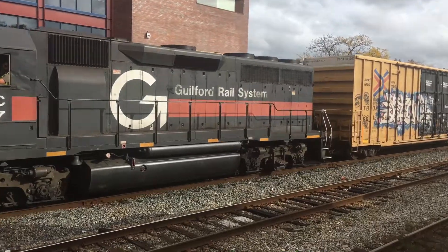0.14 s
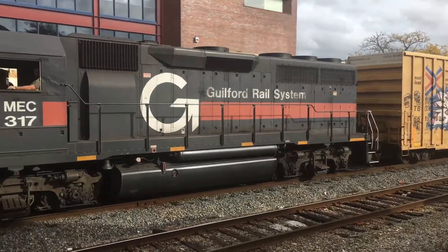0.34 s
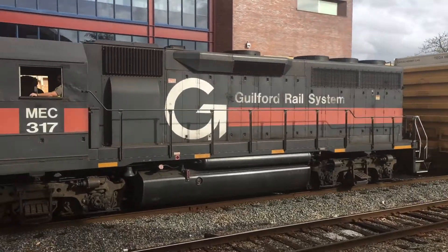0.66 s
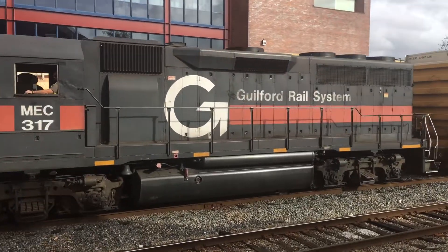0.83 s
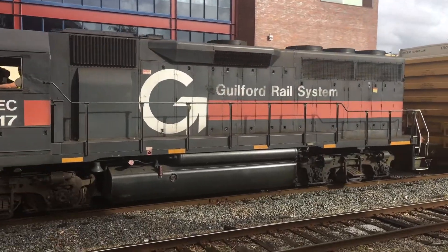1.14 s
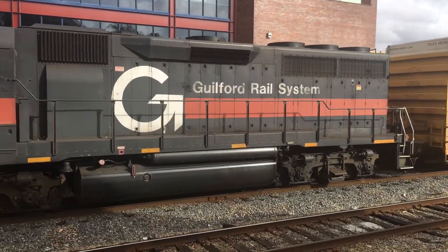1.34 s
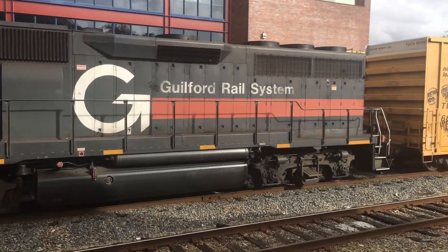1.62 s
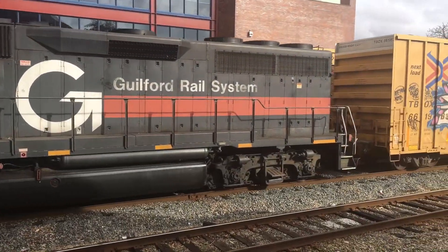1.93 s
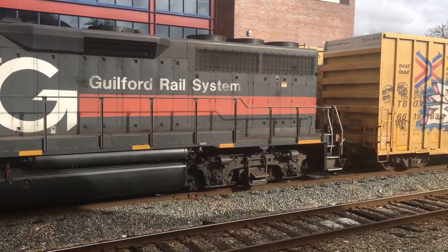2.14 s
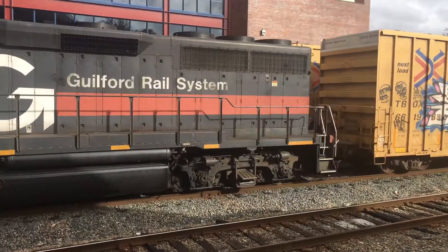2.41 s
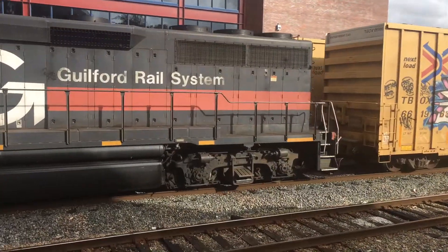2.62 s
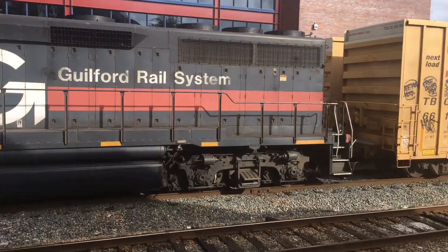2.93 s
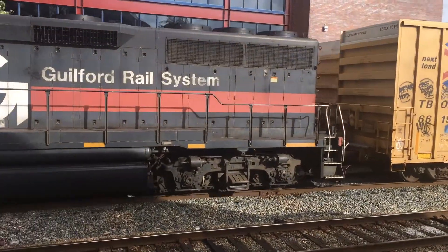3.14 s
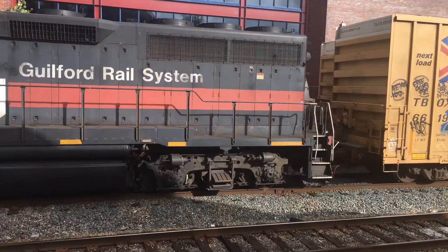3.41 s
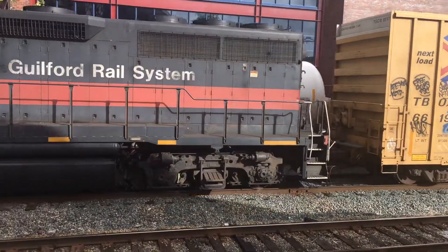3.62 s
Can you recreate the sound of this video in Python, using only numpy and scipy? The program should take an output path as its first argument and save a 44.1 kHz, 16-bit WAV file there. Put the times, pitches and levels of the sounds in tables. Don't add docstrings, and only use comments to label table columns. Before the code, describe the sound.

A diesel locomotive rolls slowly past, throbbing and whining, with wheel clacks over rail joints later

```python
import sys
import numpy as np
from scipy import signal
from scipy.io import wavfile
from scipy.ndimage import uniform_filter1d

SR = 44100
rng = np.random.default_rng(int(sys.argv[2]) if len(sys.argv) > 2 else 0)


def persist_wave(psi):
    counts = np.round(np.clip(psi, -1, 1) * 32767).astype(np.int16)
    wavfile.write(sys.argv[1], SR, np.atleast_2d(counts).T)


def ratio(d):
    e = np.asarray(d, float) / 20
    return 10 ** e


N = 166257
t = np.arange(N) / SR

CRANK_HZ, START_TURN = 5.2078, .5907
SAG_HZ_PER_S, EASE_HZ_PER_S2 = .03152, .005515
TURNS = START_TURN + CRANK_HZ * t - SAG_HZ_PER_S * t ** 2 / 2 + EASE_HZ_PER_S2 * t ** 3 / 3


def evened(x):
    return x / np.sqrt(np.mean(abs(x) ** 2) + 1e-20)


def read(points, hz):
    f, value = np.transpose(points)
    return np.interp(np.log(hz + 1), np.log(f + 1), value, -90, -90)


def curve(points):
    return ratio(np.interp(t, *np.transpose(points)))


def drift(width_hz):
    at = np.arange(-.4, N / SR + .1, 10 / SR)
    pole = np.exp(-np.pi * width_hz * 10 / SR)
    a, b = rng.standard_normal((len(at), 2)).T
    slow = signal.lfilter([1], [1, -2 * pole, pole * pole], a + 1j * b)
    return evened(np.interp(t, at, slow))


def near(share, leak=0):
    # time_s, nearness_db, air_leak_db
    running_gear = [(0, -44, 3.5), (.12, -47.5, 2.5), (.4, -48, -1.5), (.9, -47.5, -2), (1.2, -45, -1.5),
                    (2.05, -45.5, -4), (2.5, -43.5, -7), (2.85, -43.5, 0.5), (3.0, -39, -2.5),
                    (3.16, -42, 1), (3.25, -42, -3), (3.77, -45, 2)]
    s, near_db, leak_db = np.transpose(running_gear)
    middle_db = -47
    return ratio(np.interp(t, s, share * (near_db - middle_db) + leak * leak_db))


def noise(shape, size, patchy_db, flicker_db):
    hop = size // 4
    frames, hz = N // hop + 5, np.fft.rfftfreq(size, 1 / SR)
    a, b, patches = rng.standard_normal((frames, len(hz), 3)).T
    flicker = evened(uniform_filter1d(rng.standard_normal(frames), size=3))
    patches = uniform_filter1d(patches, size=10, axis=0)
    patches = evened(uniform_filter1d(patches, size=10, axis=1))
    level_db = read(shape, hz)[:, None] + patchy_db * patches + flicker_db * flicker
    spectra = (a + 1j * b) * ratio(level_db)
    return evened(signal.istft(spectra, nperseg=size, noverlap=size - hop)[1][:N])


def tone(turns, width_hz, db, steady, follow):
    waver = steady + (1 - steady) * drift(width_hz)
    return ratio(db) * near(follow) * (waver * np.exp(2j * np.pi * turns)).real


def exhaust():
    crank_orders = [8, 9, 10, 13, 14, 15, 16, 17, 18, 21, 29, 30, 31, 32, 33, 23, 53, 78, 79, 11, 12, 19]
    banks = [0, 0, 0, 1, 1, 0, -1, 0, 1, 1, 0, -1, 1, 0, 0, 0, 1, -1, 0, 1, 0, -1]
    # level_db, growth_db_per_s, echo_share (0-1), echo_cancels_s, beat_period_s
    orders = [(-31, 3, .58, 2.78, 6.25), (-26, -1, .37, .44, 3.57), (-32, -2, .79, .04, 4.17),
              (-33, 2, .6, 1.8, -2.5), (-46.5, 4.5, .59, .14, 1.14), (-19.2, .8, .48, 1.95, 2.45),
              (-30.5, .5, .85, 2.33, 2.4), (-21.8, .8, .6, 1.06, 1.53), (-34, -3, .88, 3.06, 3.12),
              (-32.5, .7, .6, 1.85, -4), (-44, 0, .97, .59, 3.12), (-33, -1.5, .5, .9, 3),
              (-53.5, 4.5, .95, .26, 1.67), (-45, 3.5, .57, 1.96, -6.25), (-47, 4, .4, .2, 1.67),
              (-40, 1, .5, .95, 2.4), (-43, -1, .1, 2.2, 3), (-38.5, -2, .2, 2.3, 4), (-39, -3, .2, 1.4, 3),
              (-35, 0, .6, 1.15, 1.45), (-39, 1, .4, .4, 3.6), (-37, 0, .7, .7, 2.4)]
    # time_s, level_db
    stack = [(0, 2), (.3, -1), (.9, 0.5), (1.5, -1.1), (2.1, -0.3), (2.6, -0.6), (3.1, 0), (3.77, -0.9)]
    bank_turn = 1 / 3
    out = np.zeros(N)
    for k, bank, (db, growth_db, echo, null_s, beat_s) in zip(crank_orders, banks, orders):
        wall = echo * np.exp(2j * np.pi * (t - null_s) / beat_s)
        paths = 1 - wall + .1 * drift(3.0)
        pulse = np.exp(2j * np.pi * (k * TURNS + bank * bank_turn))
        out += np.sqrt(2) * ratio(db + growth_db * t) * (paths * pulse).real
    return out * curve(stack)


def frame_rumble():
    # pitch_hz, level_db (per Hz)
    rumble = [(20, -21), (34, -7), (58, 0), (80, -5), (110, -3), (165, -9), (220, -15), (300, -30)]
    return ratio(-26) * near(0.55) * noise(rumble, size=8192, patchy_db=-0.5, flicker_db=0.0)


def rolling_roar():
    # pitch_hz, level_db (per Hz)
    roar = [(88, -9), (150, -14), (220, -4), (404, -6.5), (571, -11), (817, -9.5), (899, -13.5),
            (1470, -16), (2600, -32), (3380, -86), (5720, -120)]
    return ratio(-28) * near(0.48) * noise(roar, size=1024, patchy_db=1.53, flicker_db=0.17)


def air():
    # pitch_hz, level_db (per Hz)
    hiss = [(1500, -14.5), (2000, 1), (2600, -5), (3300, -1.5), (5000, -8.5), (5800, -7), (7000, -11),
            (9500, -37)]
    fizz = [(5500, -20), (7000, -7), (8500, -0.5), (9700, -4), (10600, -8.5), (13000, -9), (16000, -20)]
    return (ratio(-41.5) * near(0.96) * noise(hiss, size=512, patchy_db=1.62, flicker_db=1.18)
            + ratio(-52) * near(1.26, leak=0.89) * noise(fizz, size=512, patchy_db=2.4, flicker_db=.6))


def gear_mesh():
    # time_s, level_db
    mesh = [(0, -36), (.18, -33), (.38, -39), (.8, -33), (1.5, -35), (2.0, -39), (2.35, -36), (2.6, -43),
            (2.85, -38), (3.1, -39), (3.22, -45), (3.32, -28), (3.42, -38), (3.77, -33)]
    mesh_order = 158.1
    swell = curve(mesh) * (1 + .1 * drift(6.0))
    return np.sqrt(2) * (swell * np.exp(2j * np.pi * mesh_order * TURNS)).real


def blower():
    lobe_orders = [78, 279.5, 282.4, 288.8]
    # width_hz, level_db, steady_share (0-1), nearness_share
    lobes = [(20.5, -37, 0.11, 0.085), (10, -43.5, 0.35, 0.25), (10, -44, 0.3, 0.4), (16, -46, 0.1, .1)]
    # time_s, level_db
    load = [(0, -3.5), (.55, 5), (1.0, -2), (1.5, -5), (1.9, 2.5), (2.4, 2), (2.55, -3), (2.65, 7),
            (3.15, 3), (3.3, -4), (3.45, 7), (3.7, -7)]
    return curve(load) * sum(tone(k * TURNS, *row) for k, row in zip(lobe_orders, lobes))


def fans():
    # pitch_hz, width_hz, level_db, steady_share (0-1), nearness_share
    fan_tones = [(1687, 130, -42.5, 0.08, -1), (2853, 91, -56, 0.14, 0.22), (5660, 360, -53.5, 0.12, 1)]
    return sum(tone(hz * t, *row) for hz, *row in fan_tones)


def turbo():
    # time_s, level_db
    spin = [(0, -45.5), (.5, -44.5), (1.1, -45), (1.55, -46), (1.8, -41.5), (2.3, -40), (2.6, -38),
            (2.85, -36.5), (3.1, -38), (3.4, -36), (3.55, -38.5), (3.65, -36), (3.77, -35)]
    # width_hz, level_db
    overtones = [
        (125, 1),
        (120, -19),
        (120, -25),
    ]
    blade_hz, warble_hz, steady = 4380, 28, .4
    swell = curve(spin) * ratio(6.5)
    turns = blade_hz * t + np.cumsum(warble_hz * drift(90).real) / SR
    return swell * sum(tone((k + 1) * turns, width_hz, db, steady, 0)
                       for k, (width_hz, db) in enumerate(overtones))


def panel_rings():
    # start_s, length_s, level_db, pitch_hz
    flecks_table = [(.17, .07, -37, 1230), (1.15, 0.054, -35, 1335), (1.633, .06, -37, 1240),
                    (2.054, 0.055, -37, 1665), (2.1, 0.048, -37, 1785), (2.386, 0.032, -33, 987),
                    (2.897, 0.051, -29, 662), (2.926, .06, -35, 1140), (2.93, 0.057, -34, 1760),
                    (3.093, .07, -32, 1270), (3.3, .06, -38, 1112)]
    out = np.zeros(N)
    for s, length, db, hz in flecks_table:
        swell = np.sin(np.pi * np.clip((t - s) / length, 0, 1))
        out += ratio(db) * swell * np.sin(2 * np.pi * hz * t)
    return out


def ticks():
    # start_s, level_db, length_s
    taps = [(.698, -56, .003), (2.0647, -53, .004), (2.123, -42, .009), (2.387, -44, .004),
            (2.398, -45, .004), (2.537, -53, .003), (2.7836, -51, .003), (2.9208, -39, .009),
            (3.0335, -44, .004), (3.043, -41, .002), (3.3079, -38, .004), (3.321, -42, .004),
            (3.3418, -48, .003)]
    # pitch_hz, level_db
    tick_spectrum = [(6000, -15), (9000, -5), (12500, 0), (15500, -12), (16000, -10)]
    gate = sum(ratio(db) * (t > s) * np.exp(-((t - s) / length) ** 2) for s, db, length in taps)
    return gate * noise(tick_spectrum, size=256, patchy_db=0, flicker_db=0)


def squeaks():
    # start_s, length_s, level_db
    squeals = [
        (.96, .035, -59),
        (1.583, .035, -54),
    ]
    # pitch_hz, level_db
    partials = [(8000, -7), (13000, 0), (14800, -7)]
    gate = np.zeros(N)
    for s, length, db in squeals:
        gate += ratio(db) * np.clip(np.minimum(t - s, s + length - t) / .008, 0, 1)
    return gate * sum(ratio(db) * np.sin(2 * np.pi * hz * t) for hz, db in partials)


def clacks():
    # start_s, crack_db, ring_db, crack_length_s
    joints = [(1.015, -52, -31, .04), (1.385, -53, -29, .02), (2.063, -48, -31, .01),
              (2.1215, -41, -33, .009), (2.255, -52, -32, .012), (2.387, -38, -29, .006),
              (2.396, -42, -32, .007), (2.42, -43, -30, .005), (2.9215, -36, -27, .008),
              (2.95, -49, -28, .03), (3.033, -46, -35, .006), (3.3083, -42, -29, .004),
              (3.3205, -42, -33, .005), (3.342, -45, -38, .005), (3.356, -47, -38, .012)]
    # pitch_hz, level_db
    crack_spectrum = [(500, -8), (2000, 6), (5000, 9), (9000, 5.5), (13000, 1), (16000, -8)]
    # pitch_hz, width_hz, level_db
    rail_modes = [(680, 120, -5), (980, 120, 0), (1500, 250, -5), (2050, 250, -6), (3300, 500, -10)]
    ring_t60_s, short_ring_t60_s, crack_tail_t60_s = 0.32, 0.032, 0.2
    crack, ring = np.zeros(N), np.zeros(N)
    for s, crack_db, ring_db, length in joints:
        u = np.maximum(t - s, 0)
        rise = np.minimum(u / 0.00047, 1)
        crack_tail = ratio(-3 - 60 * u / crack_tail_t60_s)
        crack += ratio(crack_db) * rise * (np.exp(-(u / length) ** 2) + crack_tail)
        decay = ratio(-60 * u / ring_t60_s) + 0.61 * ratio(-60 * u / short_ring_t60_s)
        ring += ratio(ring_db - 4.5) * rise * decay
    rail = sum(ratio(db) * (drift(width_hz) * np.exp(2j * np.pi * hz * t)).real
               for hz, width_hz, db in rail_modes)
    grit = noise(crack_spectrum, size=256, patchy_db=0, flicker_db=0)
    return crack * grit + ring * evened(rail)


def truck_shudders():
    # start_s, length_s, level_db, pitch_hz
    thuds = [(1.949, 0.11, -23.5, 282), (2.9, 0.13, -20, 208), (2.447, 0.099, -25, 375),
             (2.95, 0.069, -14, 257.4), (2.974, 0.063, -22, 370), (3.035, 0.042, -25, 268.7),
             (3.054, 0.052, -27, 380), (3.155, 0.14, -23.5, 212), (3.273, 0.3, -22.5, 185),
             (3.36, 0.047, -18, 345), (2.93, .08, -21, 205), (2.96, .06, -25, 310), (2.39, .05, -22, 170)]
    shake = .7 + .35 * drift(40)
    out = np.zeros(N)
    for s, length, db, hz in thuds:
        swell = np.sin(np.pi * np.clip((t - s) / length, 0, 1) ** 0.58)
        out += ratio(db) * swell * (shake * np.exp(2j * np.pi * hz * t)).real
    return out


def knocks():
    # start_s, peak_db, pitch_hz
    strikes = [(2.0655, -28, 1650), (2.1225, -29, 1500), (2.3878, -13.5, 980), (2.9225, -20, 680),
               (3.3085, -17, 1000)]
    t60_s, hold_s = .009, .002
    out = np.zeros(N)
    for s, db, hz in strikes:
        u = np.maximum(t - s, 0)
        fade = ratio(db - 60 * np.maximum(u - hold_s, 0) / t60_s)
        out -= fade * (np.sin(2 * np.pi * hz * u) + 0.35 * np.sin(2 * np.pi * 1.78 * hz * u))
    return out


def scene():
    engine = exhaust() + gear_mesh() + blower() + fans() + turbo()
    bed = frame_rumble() + rolling_roar() + air()
    metal = panel_rings() + ticks() + squeaks()
    track = clacks() + truck_shudders() + knocks()
    return (engine + bed + metal + track)[None]


def top_cut(x):
    return signal.sosfilt(signal.butter(12, 15710, fs=SR, output="sos"), x)


def record(dry):
    return top_cut(dry)


dry = scene()
out = record(dry)
persist_wave(out)
```